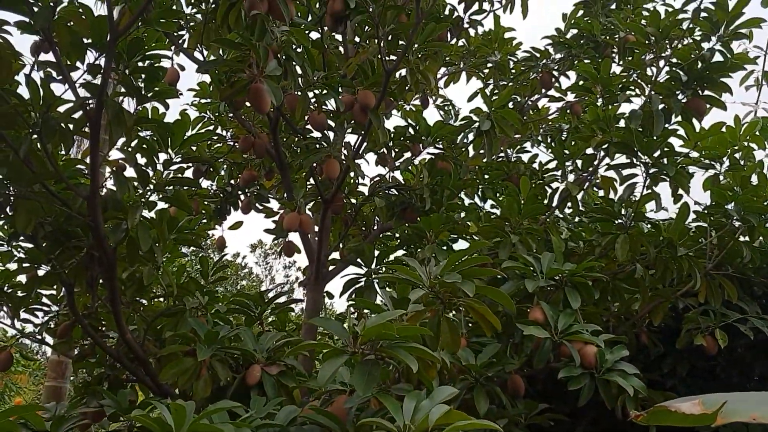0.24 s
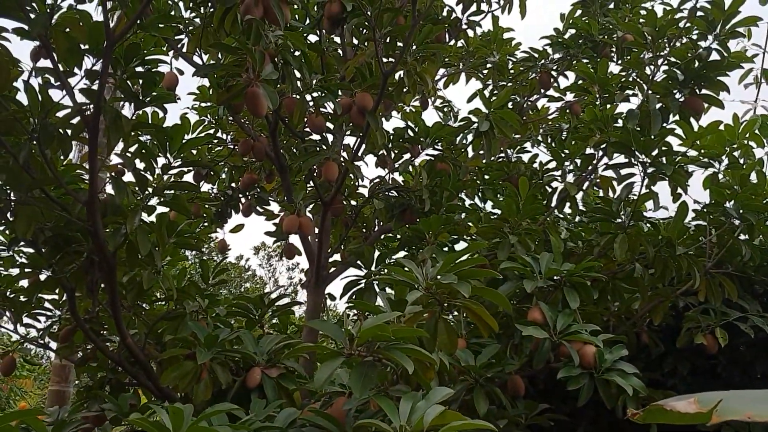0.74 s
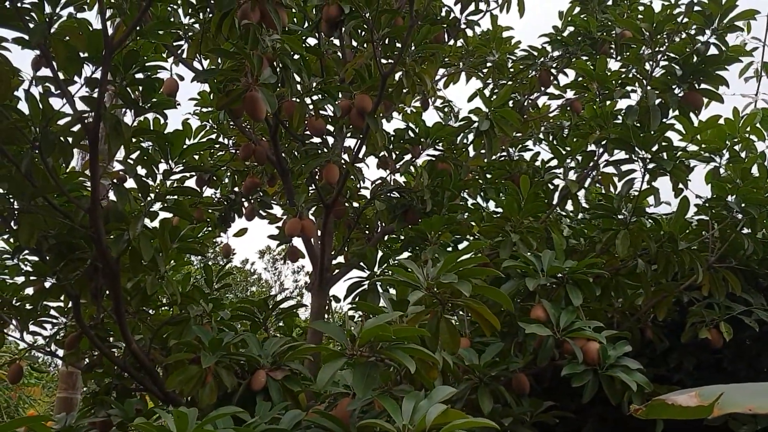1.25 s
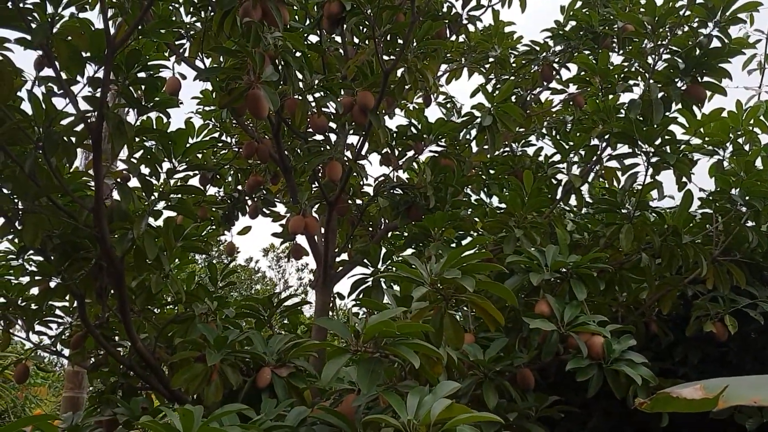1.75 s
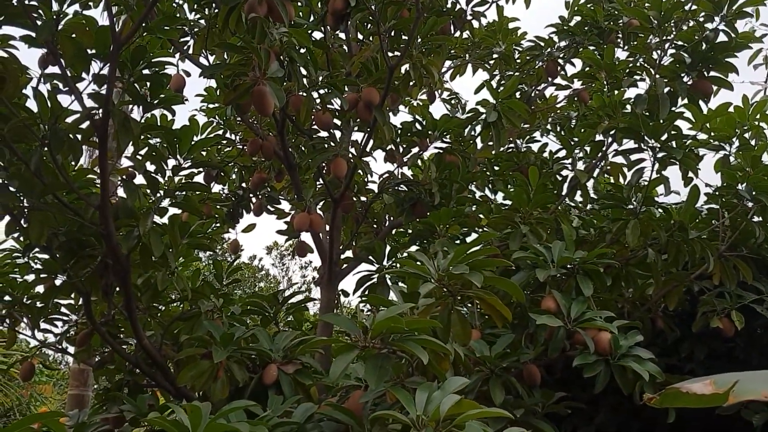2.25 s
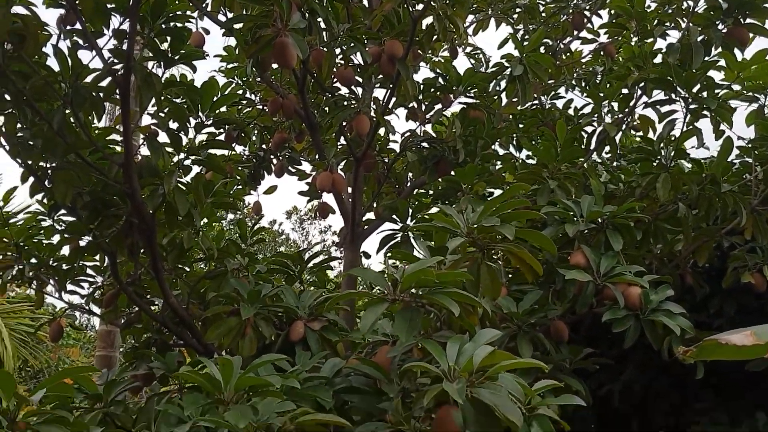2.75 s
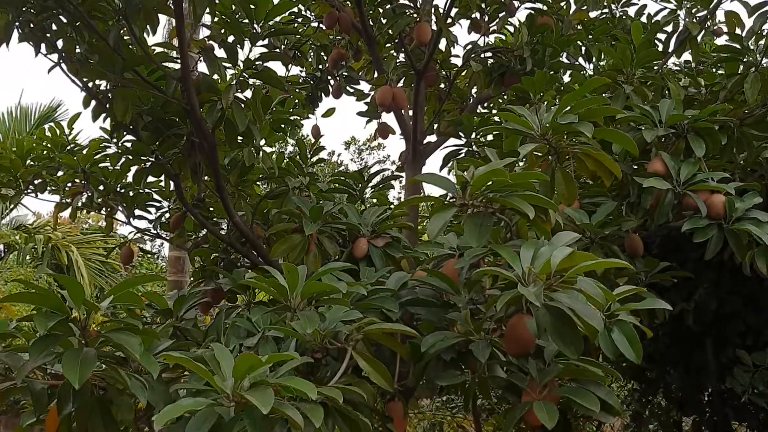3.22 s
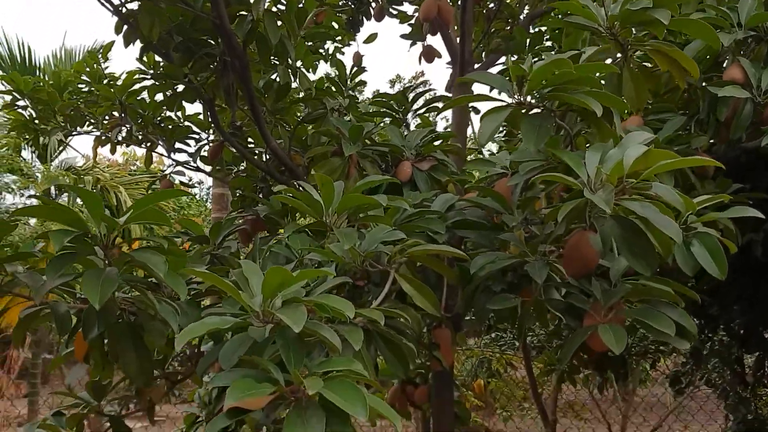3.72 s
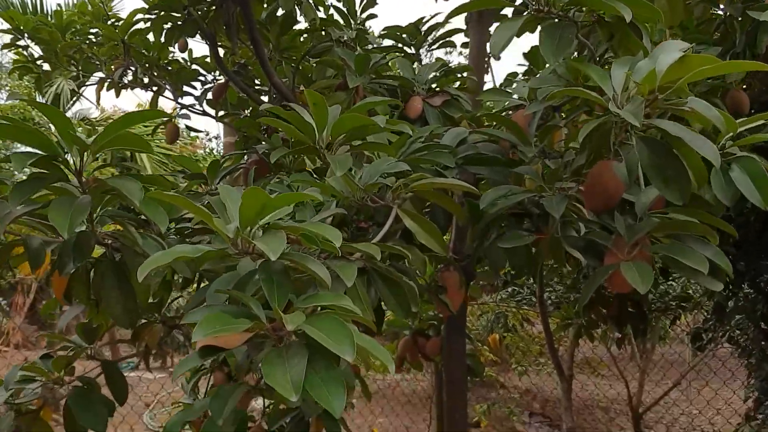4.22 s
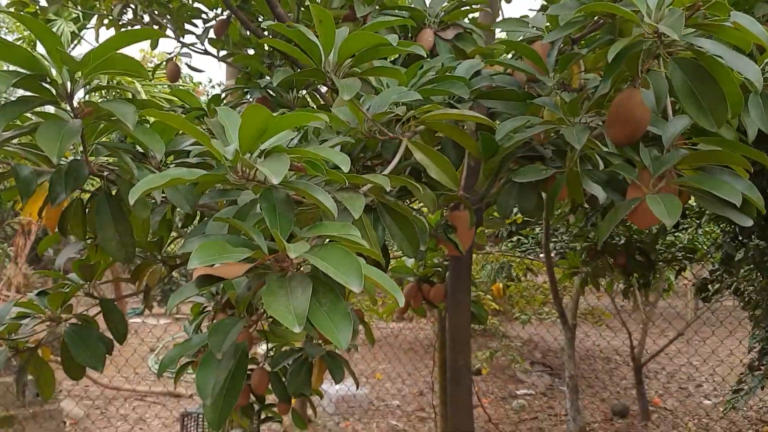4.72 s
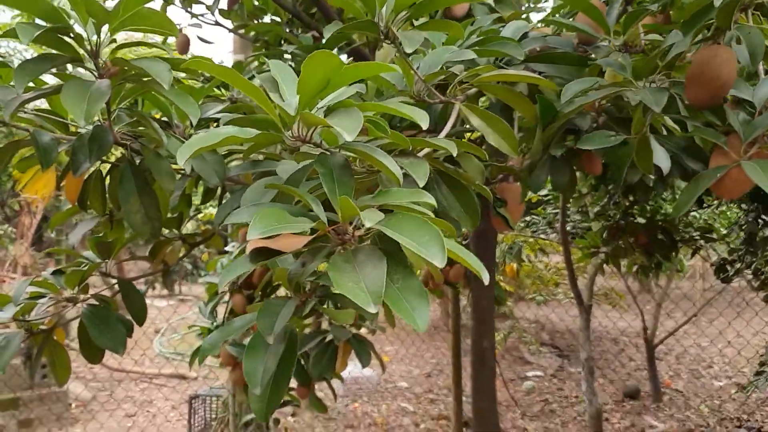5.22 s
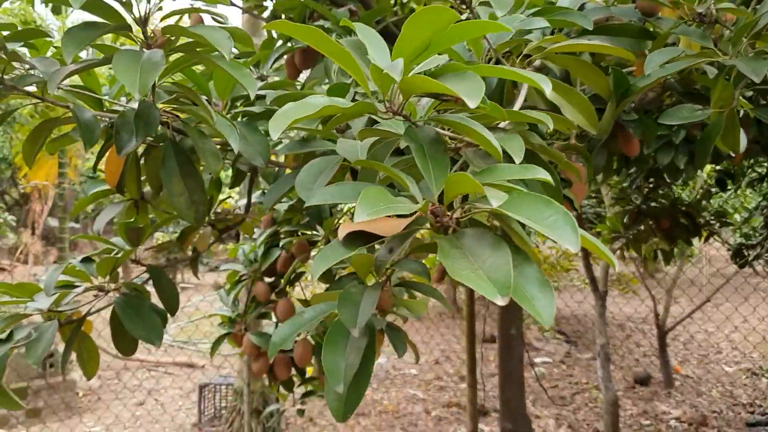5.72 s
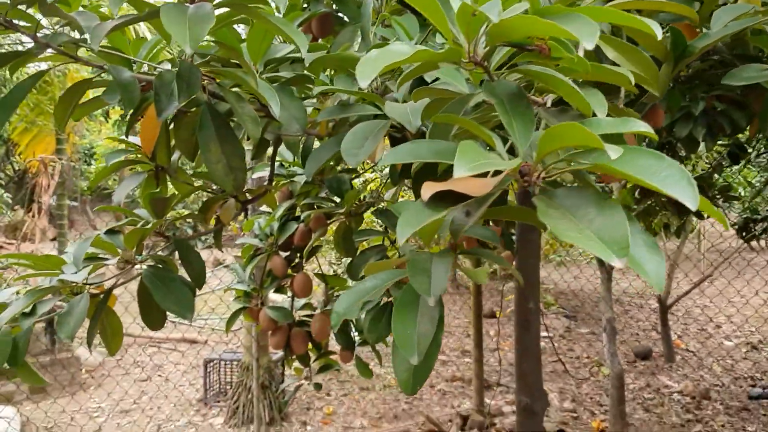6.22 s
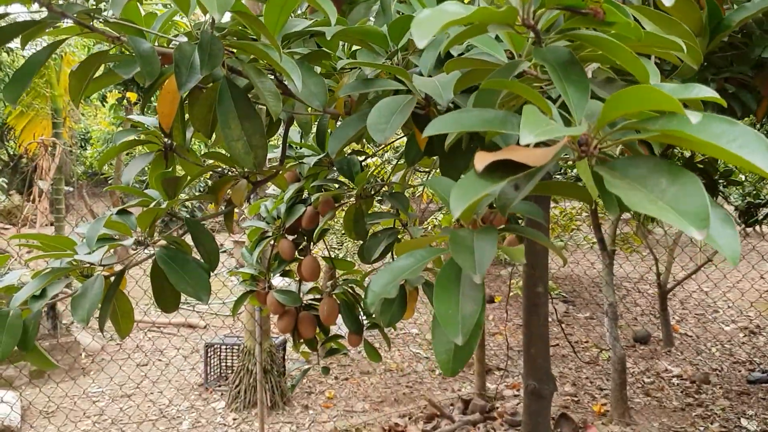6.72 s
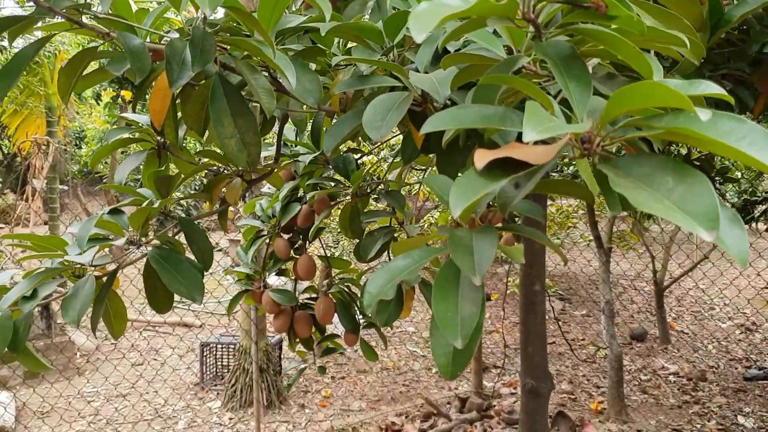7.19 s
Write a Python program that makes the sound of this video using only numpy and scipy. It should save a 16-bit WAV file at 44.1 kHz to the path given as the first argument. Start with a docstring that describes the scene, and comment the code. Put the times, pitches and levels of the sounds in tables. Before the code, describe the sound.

Hen clucking, calling and squawking outdoors, with a high descending bird whistle, close leaf rustles and a faint distant engine.

```python
"""A hen's drawn-out call, a few metres to the left in an orchard, opens a cackle: runs of short clucks,
low murmurs, more calls and two high squawks, all syrinx pulses ringing her throat and beak.
A small bird repeats a falling whistle over faint far tweets. Close by, leaves rustle and tick, dry wood
is tapped and the microphone housing is bumped. A slow engine thuds far off in a light breeze.
Ground, trunks and walls scatter the hen and the birds."""
import sys
import numpy as np
from scipy import signal
from scipy.fft import rfft, irfft, next_fast_len
from scipy.io import wavfile
from scipy.ndimage import uniform_filter1d

SR = 44100
rng = np.random.default_rng(int(sys.argv[2]) if len(sys.argv) > 2 else 0)


def digitize_waveform(pressure):
    """Quantize a signal to 16-bit integers and store it at the path in sys.argv[1].

    Rows of a 2-D input are taken as channels; values are limited to [-1, 1].
    """
    field = np.atleast_2d(pressure).T
    bounded = np.clip(field, -1, 1)
    quanta = np.round(bounded * 32767).astype(np.int16)
    wavfile.write(sys.argv[1], SR, quanta)


N = 328711
TIME_S = np.arange(N) / SR
TOP_HZ = 15800


def undb(db):
    """Decibels to gain."""
    return 10 ** (np.asarray(db) / 20)


def unit(x):
    """Scale to rms 1."""
    return x / np.sqrt(np.mean(x ** 2) + 1e-20)


def steady(x):
    """Hold the rms at 1 over a 25 ms window."""
    return x / np.sqrt(uniform_filter1d(x ** 2, size=1100) + 1e-12)


def ramp(x):
    """Clip to 0-1."""
    return np.clip(x, 0, 1)


def add(track, start_s, x):
    """Mix x into the track from start_s on."""
    i = int(start_s * SR)
    x, i = x[max(-i, 0):], max(i, 0)
    track[i:i + len(x)] += x[:N - i]


def walk(n, rate_hz):
    """Smooth random curve, spread near 1."""
    steps = np.arange(n) * rate_hz / SR
    return 1.2 * np.interp(steps, np.arange(4096), rng.standard_normal(4096))


def colour(x, response):
    """Minimum-phase filter from (frequency [Hz], gain [dB]) points."""
    size = next_fast_len(len(x) + 4096) // 2 * 2
    hz, db = np.transpose(response)
    bin_hz = np.arange(size // 2 + 1) * SR / size
    gain = undb(np.interp(np.log(bin_hz + 1), np.log(hz), db))
    cepstrum = irfft(np.log(gain))
    cepstrum[1:size // 2] *= 2
    cepstrum[size // 2 + 1:] = 0
    return irfft(rfft(x, size) * np.exp(rfft(cepstrum)))[:len(x)]


def lowpass(x, hz):
    """Steep, zero-phase low-pass."""
    return signal.sosfiltfilt(signal.butter(4, hz, fs=SR, output="sos"), x)


# breeze spectrum: (frequency [Hz], gain [dB])
BREEZE_EQ = [(15, -43), (25, -16.5), (66, -7), (101, -8), (204, -12), (289, -16), (445, -30.5), (804, -26),
             (2630, -38.5), (8130, -41.5), (11500, -39.5), (15500, -40.5)]


def breeze(level_db=-63, side_db=-4):
    """Faint moving air, swelling slowly."""
    mid, left, right = (unit(colour(rng.standard_normal(N), BREEZE_EQ)) for _ in range(3))
    return undb(level_db + walk(N, 3.0)) * (mid + undb(side_db) * np.array([left, right]))


# engine run: (time [s], firing rate [Hz], level [dB])
ENGINE_RUN = [(0.0, 16.4, -57.5), (2.55, 17.1, -54), (7.45, 18.2, -53)]
# distant exhaust: (frequency [Hz], gain [dB])
EXHAUST_EQ = [(25, -35), (48, -11.5), (65, -22), (84, 2.5), (105, -7), (135, -5), (175, -26), (260, -29),
              (500, -56.5)]


def far_engine(gain_db=-1, rumble_db=-5):
    """One exhaust thud per firing; distance leaves only the bass and blurs part of it into a rumble."""
    times_s, rates_hz, levels_db = np.transpose(ENGINE_RUN)
    rate_hz = np.interp(TIME_S, times_s, rates_hz) * (1 + .015 * walk(N, 16))
    level_db = np.interp(TIME_S, times_s, levels_db)
    firings = np.diff(np.floor(np.cumsum(rate_hz) / SR), prepend=0)
    thuds = unit(colour(firings * undb(1.2 * walk(N, 16)), EXHAUST_EQ))
    rumble = np.array([unit(colour(rng.standard_normal(N), EXHAUST_EQ)) for _ in range(2)])
    return undb(level_db + gain_db) * (thuds + undb(rumble_db) * rumble)


def bird_tone(hz, waver):
    """A nearly pure note with random pitch waver."""
    wavering_hz = hz * (1 + waver * walk(len(hz), 250))
    return np.sqrt(2) * np.sin(2 * np.pi * np.cumsum(wavering_hz) / SR)


# far tweets: (time [s], length [s], start pitch [Hz], end pitch [Hz], level [dB])
FAR_TWEETS = [(.93, 0.14, 6540, 5200, -70.5), (1.046, 0.083, 5140, 6300, -73),
              (2.626, 0.15, 6660, 5300, -68.5), (2.636, 0.14, 2300, 2450, -72),
              (2.765, 0.076, 5150, 6200, -68.5), (3.033, 0.19, 5300, 6500, -66.5),
              (5.305, 0.036, 6039, 5380, -63.5), (5.739, 0.11, 6770, 5400, -68.5)]


def far_birds():
    """Thin, faint slurs; the low one is hoarse."""
    out = np.zeros(N)
    for start_s, length_s, from_hz, to_hz, db in FAR_TWEETS:
        n = int(length_s * SR)
        slur = bird_tone(np.geomspace(from_hz, to_hz, n), waver=.1 if from_hz < 3000 else .05)
        add(out, start_s, undb(db) * np.hanning(n) ** .5 * slur)
    return out


# taps on wood: (time [s], level [dB])
WOOD_TAPS = [(4.963, -43), (5.003, -43), (5.065, -40.5)]


def wood_taps(ring_s=.007):
    """Light taps on dry wood: short, hollow ticks."""
    out, t = np.zeros(N), np.arange(2000) / SR
    for start_s, db in WOOD_TAPS:
        add(out, start_s, undb(db) * np.exp(-t / ring_s) * rng.standard_normal(len(t)))
    return colour(out, [(400, -11.5), (950, 8.5), (1600, -4), (2800, 0.5), (6000, -29)])


# bumps: (time [s], thump level [dB], click level [dB])
HOUSING_BUMPS = [(1.516, -27, -27), (1.628, -40, -44), (6.904, -40, -66)]


def housing_bumps(thump_hz=95, thump_s=0.01, click_s=0.00089):
    """The bumped microphone housing gives a click and a short low thud."""
    out, t = np.zeros(N), np.arange(4000) / SR
    for start_s, thump_db, click_db in HOUSING_BUMPS:
        impact = np.exp(-t / click_s) * rng.standard_normal(len(t))
        click = colour(impact, [(60, 3), (300, 25), (2000, 14.5), (12000, -16)])
        thump = np.exp(-t / thump_s) * np.sin(2 * np.pi * thump_hz * t)
        add(out, start_s, undb(thump_db) * thump + undb(click_db) * click)
    return out


# rustle envelope: (time [s], level [dB])
LEAF_RUSTLE = [(3.08, -77), (3.2, -50.5), (3.35, -50), (3.42, -55.5), (3.7, -49.5), (3.8, -55), (4.08, -44),
               (4.45, -70), (4.85, -61.5), (5.35, -68.5)]
# leaf and twig ticks: (time [s], level [dB])
LEAF_TICKS = [(3.3433, -52), (3.4845, -53), (3.6814, -42), (3.7626, -48), (3.8646, -41), (4.0521, -23),
              (4.142, -37.5), (4.8534, -50.5), (4.932, -70)]
# leaf spectrum: (frequency [Hz], gain [dB])
LEAF_EQ = [(400, -28.5), (1200, -5), (3000, 2), (6000, -7), (9000, -4.5), (13000, -4), (16000, -7)]


def leaves(rustle_db=2, grain_db=4, tick_db=3, tick_s=0.011):
    """Leaves brush in dense tiny scrapes, with a few sharper ticks."""
    level_db = np.interp(TIME_S, *np.transpose(LEAF_RUSTLE), left=-120, right=-120)
    noise = rng.standard_normal(N)
    grains = np.repeat(rng.standard_normal(N // 32 + 1), 32)[:N]
    out = unit(noise * undb(grain_db * grains)) * undb(level_db + rustle_db + 2.0 * walk(N, 40))
    t = np.arange(2000) / SR
    for start_s, db in LEAF_TICKS:
        add(out, start_s, undb(db + tick_db) * np.exp(-t / tick_s) * rng.standard_normal(len(t)))
    return colour(out, LEAF_EQ)


# whistles: (time [s], level [dB])
NEAR_WHISTLES = [(1.34, -34), (2.297, -35), (3.585, -36), (4.782, -34.5), (5.972, -34), (7.109, -34)]


def near_bird(gain_db=-2.0, length_s=.195, attack_s=0.0058, release_s=0.055, fade_db_per_s=67.5,
              start_hz=5950, knee_s=.016, fall_power=.325, end_drop=.08):
    """A fluttering, fading whistle dives fast, then ever more slowly, and drops a little as it dies."""
    out, t = np.zeros(N), np.arange(0, length_s, 1 / SR)
    dying = ramp(1 - (length_s - t) / release_s)
    hz = start_hz * (1 + t / knee_s) ** -fall_power * (1 - end_drop * dying)
    envelope = ramp(t / attack_s) * (1 - dying) * undb(-fade_db_per_s * t)
    for start_s, db in NEAR_WHISTLES:
        flutter_db = 3 * walk(len(t), 90)
        add(out, start_s, envelope * undb(db + gain_db + flutter_db) * bird_tone(hz, waver=.014))
    return out


# hen's throat and beak: (frequency [Hz], gain [dB])
THROAT_EQ = [(150, -17.5), (300, -3.5), (470, -2), (720, 8), (940, 3.5), (1170, -4), (1450, -7),
             (1880, -6.5), (2250, -15.5), (2850, -21.5), (3400, -33.5), (5200, -32.5), (8000, -41.5),
             (15000, -50.5)]


def hen_voice(hz, rough, doubling, second_db, treble_db, neck_db):
    """Syrinx pulses, uneven when rough, ring the throat; levels are relative to the first resonance."""
    n, rough = len(hz), ramp(rough)
    jitter = (.0015 + .12 * rough) * walk(n, 600) + .0015 * walk(n, 60)
    phase = 2 * np.pi * np.cumsum(hz * (1 + jitter)) / SR
    harmonics = np.arange(1, int(TOP_HZ / np.mean(hz)) + 1)
    pulses = unit(np.cos(np.outer(phase, harmonics)).sum(axis=1))
    pulses *= undb(4.4 * rough * np.tanh(walk(n, 400)))
    pulses *= 1 + doubling * np.cos(phase / 2)  # strong and weak beats alternate
    rasp = rng.standard_normal(n) * (1 + np.cos(phase))  # air escapes once a cycle
    hiss = rasp - lowpass(rasp, 3200)
    sound = colour(pulses + (0.0281 + 1.23 * rough) * rasp + .3 * hiss, THROAT_EQ)
    pitch_hz = np.median(hz)
    for near_hz, q, lift in ((850, 25.0, 0.57), (1762, 5.3, 0.91)):
        tuned_hz = np.round(near_hz / pitch_hz) * pitch_hz  # resonance on the nearest harmonic
        sound = sound + lift * signal.lfilter(*signal.iirpeak(tuned_hz, q, fs=SR), sound)
    first, both = lowpass(sound, 1200), lowpass(sound, 2500)
    second, treble = both - first, sound - both
    neck = undb(neck_db) * np.sin(phase)  # the fundamental also leaves through the skin
    return neck + steady(first) + undb(second_db) * steady(second) + undb(treble_db) * steady(treble)


def push_of_air(length_s, hz, rough, second_db, treble_db, neck_db, arch=.3, skew=1.1, opening_db=14):
    """One short push swells from a low grunt; the beak opens with the pressure."""
    push = np.abs(np.sin(np.pi * np.linspace(0, 1, int(length_s * SR)) ** skew))
    shut = (1 - push) ** 1.5
    muffle_db = opening_db * shut
    sound = hen_voice(hz * (1 - arch * shut), rough + 0.36 * shut, 0,
                      second_db - muffle_db / 2, treble_db - muffle_db, neck_db + 1.5 * muffle_db)
    return push ** 1.26 * sound


# murmurs trailing some clucks and calls: (time [s], pitch [Hz], level [dB])
HEN_MURMURS = [(1.345, 369.4, -41), (1.572, 375.4, -40), (2.242, 383.6, -35.5), (3.312, 342.6, -48),
               (3.531, 345.7, -47), (3.707, 333.3, -35.5), (3.882, 443, -42), (5.413, 376, -44.5),
               (5.66, 383, -43), (6.122, 387, -41)]


def hen_murmurs(gain_db=2, length_s=.088, lead_s=.008):
    """The last air leaves through the shut beak as a soft, dull, nearly level note."""
    out = np.zeros(N)
    for start_s, hz, db in HEN_MURMURS:
        sound = push_of_air(length_s, hz, rough=.35, second_db=-12, treble_db=-18, neck_db=-12, arch=.15)
        add(out, start_s - lead_s, undb(db + gain_db) * sound)
    return out


# clucks: (time [s], length [s], pitch [Hz], level [dB], relative treble [dB], roughness [0-1])
HEN_CLUCKS = [ (-.025, 0.076, 372, -39, -14.5, .6), (1.298, 0.064, 389, -32, -11.5, 0.84),
              (1.526, 0.062, 480.4, -27, -12.5, 0.44), (1.769, 0.061, 397.5, -32.5, -20.5, 0.85),
              (1.803, 0.053, 461, -28, -13, 0.37), (2.487, 0.054, 454.8, -32, -14, 0.48),
              (3.264, 0.077, 347.7, -36, -18, 0.59), (3.482, 0.078, 364.7, -35, -17, 0.71),
              (3.643, 0.05, 464, -29.5, -12, 0.38), (3.85, 0.05, 495.2, -26, -10.5, 0.18),
              (5.368, .07, 386.8, -32.5, -22.5, 0.32), (5.61, 0.072, 385.7, -33, -21.5, 0.36),
              (5.829, .1, 389.8, -31.5, -17.5, 0.74), (6.067, 0.078, 398.4, -30.5, -16, 0.72),
              (6.925, 0.066, 460.7, -35, -13, 0.29), (7.13, 0.066, 484, -32.5, -14, .2)]
# half-open beak: (frequency [Hz], gain [dB])
CLUCK_BEAK_EQ = [(250, 2), (380, -6), (500, -1), (750, -1.5), (1300, 1), (2000, 0), (2650, 0.5),
                 (3800, -0.5), (6000, -0.5), (9000, -1.5)]


def hen_clucks(gain_db=2, lead_s=.006, mid_pitch_hz=420, neck_db=-11, neck_db_per_octave=-12):
    """A wider beak lifts the treble and, less, the second resonance; lower clucks have more body."""
    out = np.zeros(N)
    for start_s, length_s, hz, db, treble_db, rough in HEN_CLUCKS:
        body_db = neck_db + neck_db_per_octave * np.log2(hz / mid_pitch_hz)
        second_db = 2.5 + 0.61 * treble_db
        sound = push_of_air(length_s + lead_s, hz, rough, second_db, treble_db, body_db)
        add(out, start_s - lead_s, undb(db + gain_db) * sound)
    return colour(out, CLUCK_BEAK_EQ)


def call_stages(harsh_s, hold_s, collapse_s, clear_rough, harsh_rough, edge_s=0.013, break_s=.02):
    """A call starts harsh, holds a clear note from t = 0, then breaks."""
    t = np.arange(-harsh_s, hold_s + collapse_s, 1 / SR)
    unsettled, collapsed = ramp(-t / harsh_s), ramp((t - hold_s) / collapse_s)
    rough = clear_rough + harsh_rough * (ramp(1.3 * unsettled) + ramp((t - hold_s) / break_s))
    gate = ramp(np.minimum(t - t[0], t[-1] - t) / edge_s)
    return t, unsettled, collapsed, rough, gate


# squawks: (time [s], harsh start [s], hold [s], collapse [s], first resonance [dB],
# second resonance [dB], treble [dB], fade [dB/s])
HEN_SQUAWKS = [ (3.923, .04, .136, 0.026, -31, -18.5, -33.5, 38.5),
               (7.216, .056, .134, 0.037, -36, -31.5, -40.5, -27.5)]
# piercing ring of the stretched neck: (frequency [Hz], gain [dB])
STRETCHED_NECK_EQ = [(400, -3), (750, 0), (1500, 2.5), (2200, -5), (2950, 4.5), (3800, 0), (9000, 0)]


def hen_squawks(from_hz=795, to_hz=729.5, settle_s=0.047, scoop=.22, droop=0.2, start_db=-6,
                collapse_db=-7, shut_db=-6, overshoot_db=6, burst_db=4, burst_s=0.034, waver_db=1.4):
    """The voice bursts into its high register, overshoots into the first resonance and settles."""
    out = np.zeros(N)
    for start_s, harsh_s, hold_s, collapse_s, first_db, second_db, treble_db, fade_db_s in HEN_SQUAWKS:
        t, unsettled, collapsed, rough, gate = call_stages(
            harsh_s, hold_s, collapse_s, clear_rough=0.01, harsh_rough=.85)
        held_s = np.clip(t, 0, hold_s)
        overshoot = np.exp(-(held_s / settle_s) ** 1.4)
        hz = to_hz + (from_hz - to_hz) * overshoot
        hz *= 1 - scoop * unsettled ** 2 - droop * collapsed
        burst = np.exp(-(t / burst_s + .5) ** 2)
        effort_db = start_db * unsettled + burst_db * burst + collapse_db * collapsed - fade_db_s * held_s
        low_db = first_db + overshoot_db * overshoot
        beak_db = shut_db * (unsettled + collapsed)  # widest on the held note
        mid_db = second_db + beak_db + waver_db * walk(len(t), 32)
        sound = hen_voice(hz, rough + .2 * burst, 0, mid_db - low_db, treble_db - low_db, neck_db=-34)
        add(out, start_s, gate * undb(effort_db + low_db) * sound)
    return colour(out, STRETCHED_NECK_EQ)


# voice cracks: (time [s], half length [s], depth [0-1], doubling decay [s])
VOICE_CRACKS = [(0.247, .03, 0.53, 0.11), (6.348, 0.027, 0.4, 0.01)]


def voice_cracks(time_s, doubling=0.064):
    """The voice cracks briefly; period doubling lingers after it."""
    crack = 0
    for crack_s, half_s, depth, linger_s in VOICE_CRACKS:
        since_s = time_s - crack_s
        crack += depth * np.exp(-(since_s / half_s) ** 2)
        doubling += depth * ramp(1 + since_s / half_s) * np.exp(-np.maximum(since_s, 0) / linger_s)
    return crack, doubling


# long calls: (time [s], hold [s], pitch [Hz], sag [share of pitch], lowest point [share of hold],
# low band [dB], low-band dip [dB], upper band [dB], treble [dB])
HEN_CALLS = [ (0.078, 0.23, 473.8, .034, 0.54, -33, 9, -35.5, -46),
             (1.916, .222, 476.3, .028, .33, -33, -1, -32.5, -42.5),
             (4.078, .186, 479.8, .045, .26, -31.5, 8.5, -31.5, -44),
             (6.226, .24, 475.8, 0.047, 0.42, -32.5, -0.5, -33, -45)]
# wide-open beak, thinning the fundamental: (frequency [Hz], gain [dB])
OPEN_BEAK_EQ = [(450, -5), (700, 1), (1900, 0), (2800, -1.5), (3500, 2), (5500, 4), (9000, 1.5)]


def hen_calls(harsh_s=.05, collapse_s=.088, scoop=.12, droop=.13, start_db=1.0, collapse_db=-11,
              swell_db=4, harsh_treble_db=-5, crack_db=6, crack_rough=0.44, waver_db=2.3):
    """The held note sags and recovers; as it sags, its upper band swells and, in some calls,
    its lower band dips."""
    out = np.zeros(N)
    for start_s, hold_s, pitch_hz, sag_share, lowest, lower_db, dip_db, upper_db, treble_db in HEN_CALLS:
        t, unsettled, collapsed, rough, gate = call_stages(
            harsh_s, hold_s, collapse_s, clear_rough=0.045, harsh_rough=0.794)
        sag = np.sin(np.pi / 2 * np.interp(t / hold_s, [0, lowest, 1], [0, 1, 0])) ** 1.3
        crack, doubling = voice_cracks(start_s + harsh_s + t)
        rough += crack_rough * crack
        hz = pitch_hz * (1 - sag_share * sag - scoop * unsettled ** 2 - droop * collapsed)
        effort_db = start_db * unsettled + collapse_db * collapsed + crack_db * crack
        low_db = lower_db - dip_db * sag * (1 - ramp(crack)) + waver_db * walk(len(t), 25)
        mid_db = upper_db + swell_db * sag + waver_db * walk(len(t), 24.5)
        high_db = treble_db + harsh_treble_db * (unsettled + collapsed)
        sound = hen_voice(hz, rough, doubling, mid_db - low_db, high_db - low_db, neck_db=-34)
        add(out, start_s, gate * undb(effort_db + low_db) * sound)
    return colour(out, OPEN_BEAK_EQ)


# ground and trunk reflections: (frequency [Hz], gain [dB])
SCATTER_EQ = [(100, 14.5), (400, 2), (2000, 2.5), (5000, 11), (9000, 0.5), (15000, -21.5)]


def orchard(x, left_db, lag_ms, early_db, late_db, early_t60_s=0.23, late_t60_s=0.82, shadow_hz=550):
    """Place a source on the left; ground and trunks scatter it, far walls add a tail."""
    t = np.arange(SR) / SR
    out = []
    for side, delay_ms in ((1, 0), (-1, lag_ms)):
        direct = np.interp(TIME_S - delay_ms / 1000, TIME_S, x, left=0)
        sparse = rng.standard_normal(SR) * (rng.random(SR) < .03)
        early = colour(sparse * undb(-60 * t / early_t60_s) * (t > .002), SCATTER_EQ)
        late = lowpass(rng.standard_normal(SR), 4500) * undb(-60 * t / late_t60_s) * ramp(t / .04)
        echoes = (undb(early_db) * unit(early) + undb(late_db) * unit(late)) / np.sqrt(SR)
        heard = direct + signal.fftconvolve(x, echoes)[:N]
        bass = lowpass(heard, shadow_hz)  # long waves bend round the housing
        out.append(bass + undb(side * left_db / 2) * (heard - bass))
    return np.array(out)


def scene():
    """Stereo mix: hen and birds among the trees, small noises close by, engine and breeze behind."""
    cackle = hen_calls() + hen_squawks() + hen_clucks() + hen_murmurs()
    hen = orchard(cackle, left_db=7, lag_ms=0.34, early_db=-4.5, late_db=-28.5)
    bird = orchard(near_bird(), left_db=6.0, lag_ms=0.062, early_db=-7.0, late_db=-19.5)
    tweets = undb(0.5) * orchard(far_birds(), left_db=13.5, lag_ms=0, early_db=-5.5, late_db=4)
    close = np.outer(undb([2, -1]), leaves()) + np.outer(undb([2, -10]), housing_bumps()) + wood_taps()
    background = undb([[-1], [1]]) * far_engine() + breeze()
    return background + tweets + close + bird + hen


def record(dry):
    """Steep low-pass at TOP_HZ."""
    return signal.sosfilt(signal.ellip(10, .2, 70, TOP_HZ, fs=SR, output="sos"), dry)


dry = scene()
out = record(dry)
digitize_waveform(out)
```